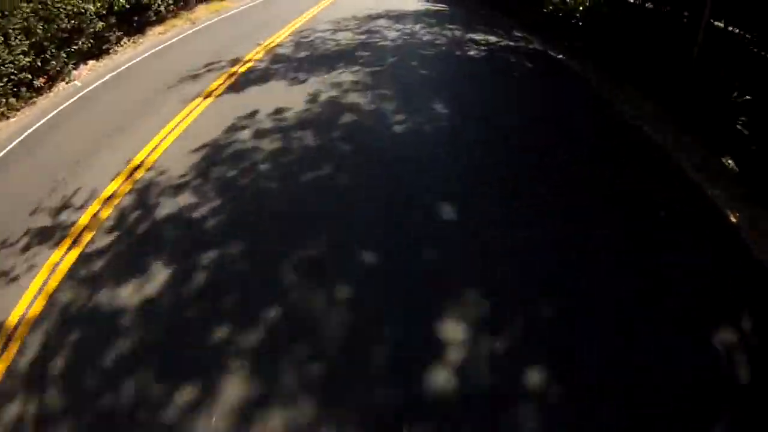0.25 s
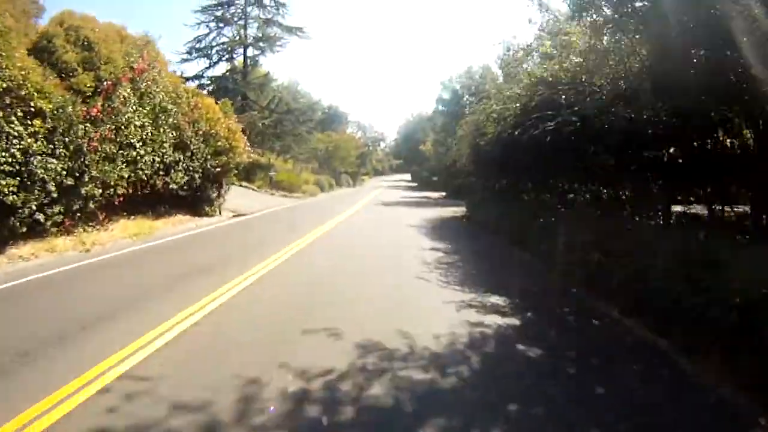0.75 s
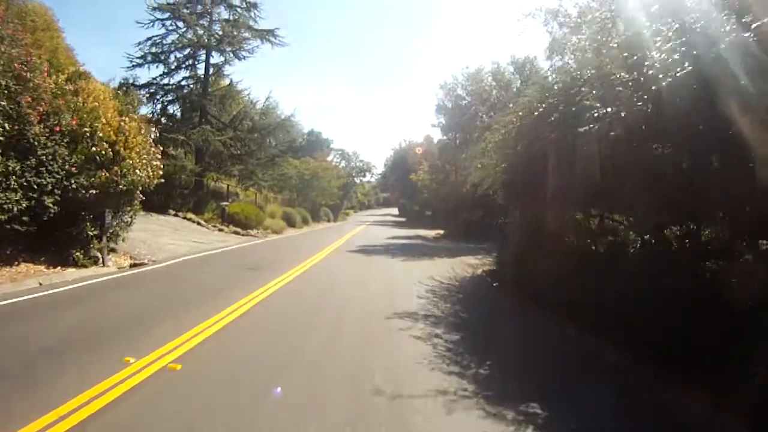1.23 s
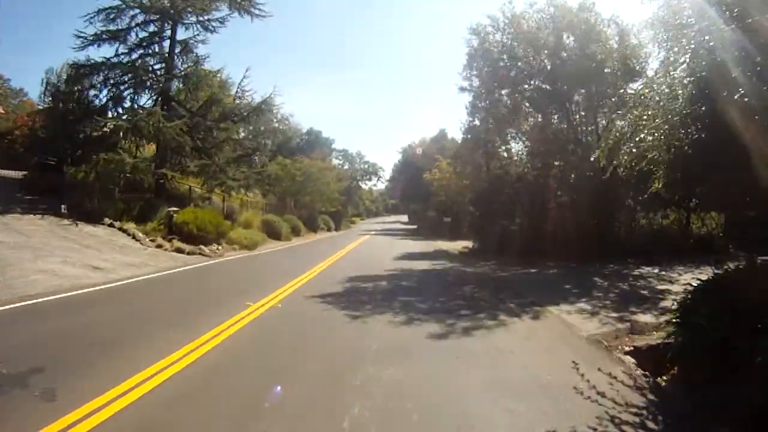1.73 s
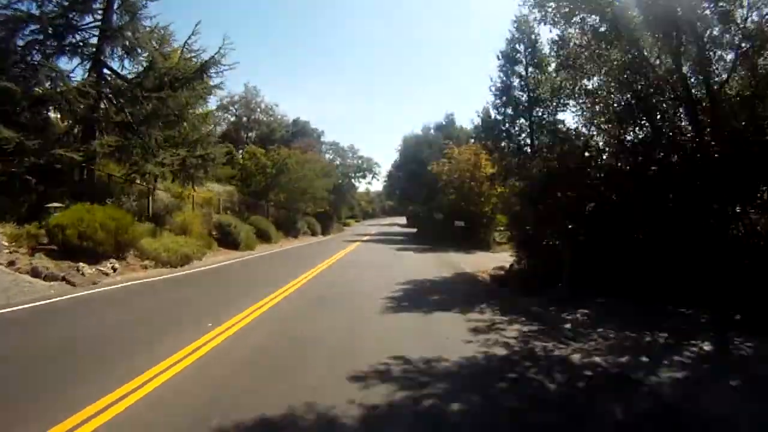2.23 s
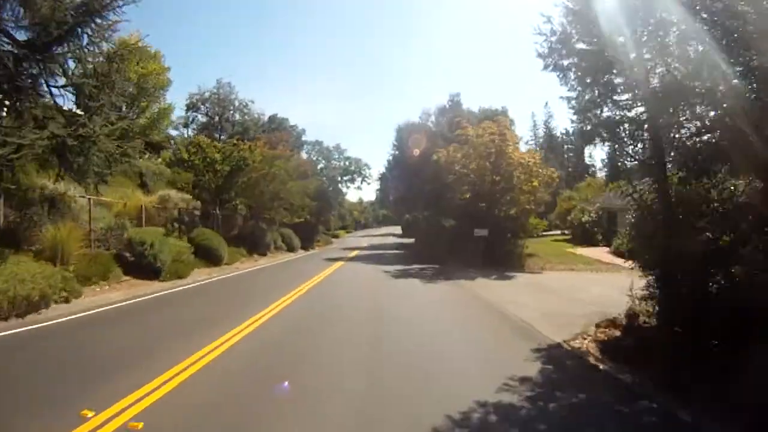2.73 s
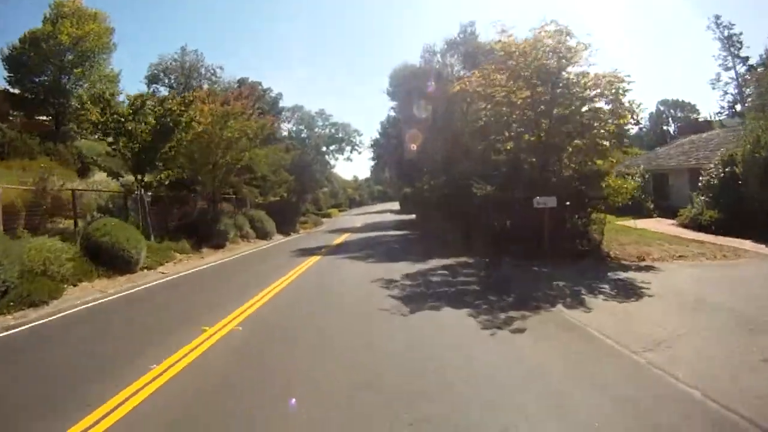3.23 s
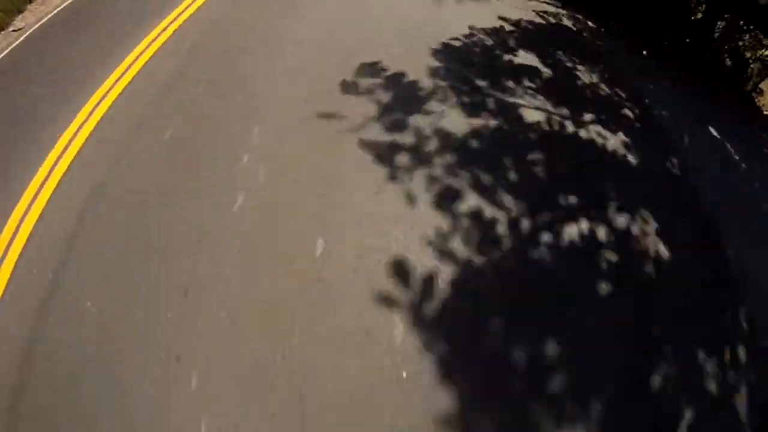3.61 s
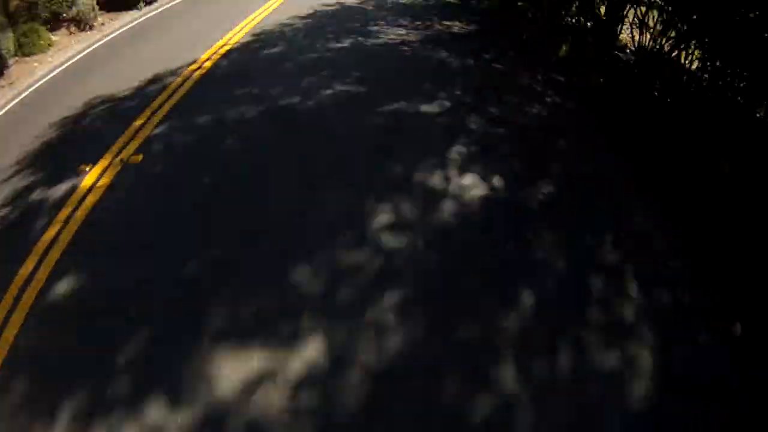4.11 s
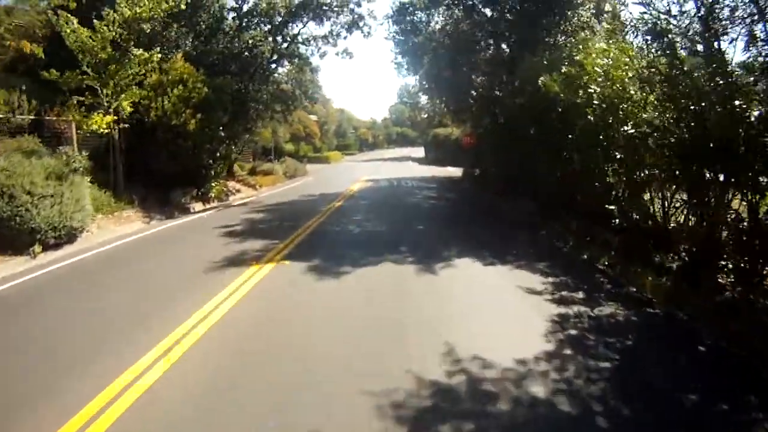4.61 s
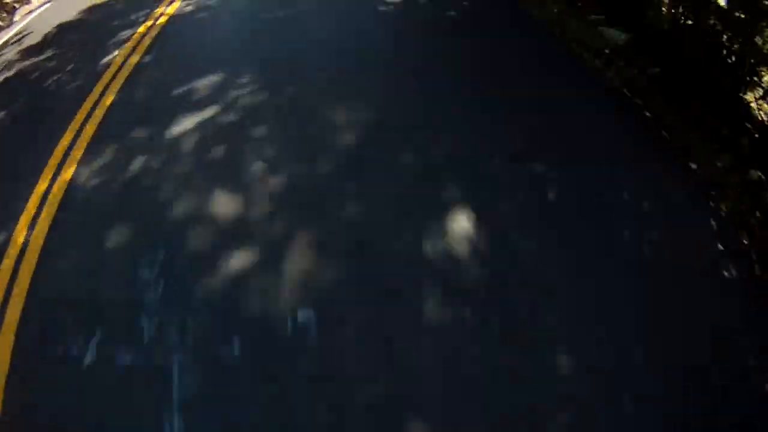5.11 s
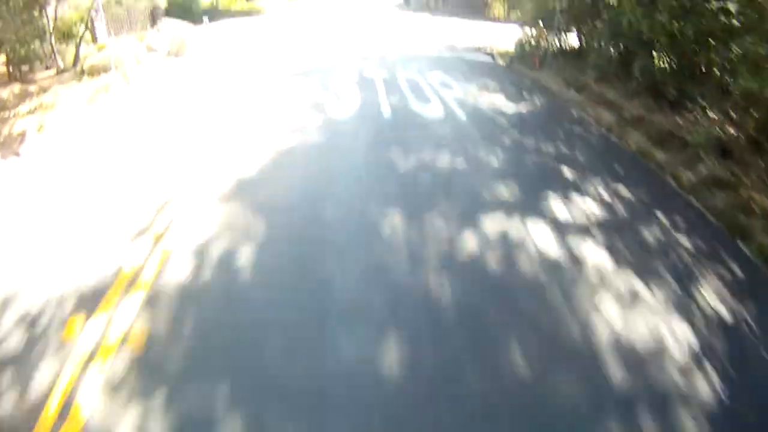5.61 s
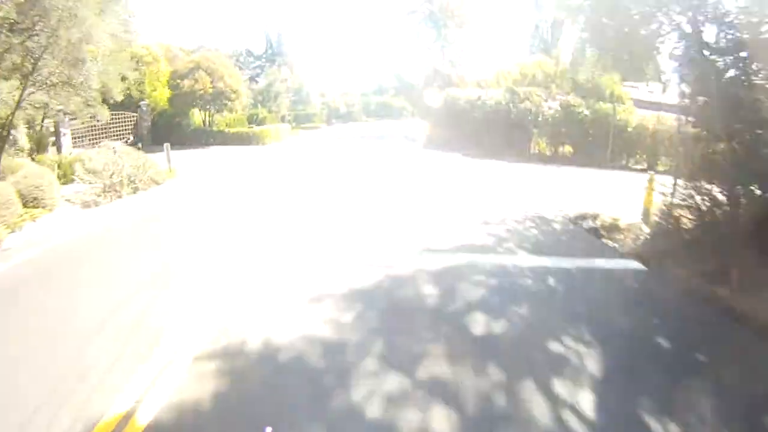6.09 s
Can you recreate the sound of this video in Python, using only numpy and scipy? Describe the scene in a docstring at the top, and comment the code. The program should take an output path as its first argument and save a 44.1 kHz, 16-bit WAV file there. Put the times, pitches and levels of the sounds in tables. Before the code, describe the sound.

A longboard rolls downhill on an open asphalt road, captured by a small camera microphone on board. A dense, grainy wheel rattle runs throughout, rising a little as speed builds, over a low wind drone and mount hum. At 0 s a brief rough scrub gives way to a duller tone and a soft wind thump near 0.2 s; brightness returns by 0.7 s. Short ringing scrapes near 2 kHz bite at 1.4, 1.55 and 1.7 s, a longer, softer one from 2.1 s, and the strongest at 2.85 to 3.3 s, fading slightly. From 3.5 to 4.1 s the wheels sound muffled, with a deep buffet at 3.6 s, then clear by 4.5 s with a gust around 4.3 s. They dull again from 5 to 5.6 s. Tiny stone ticks dot 5 to 6.3 s, sharpest just before 6 s, amid a swelling gust. Thin metallic treble throughout.

```python
"""Wheels rattle and scrub over asphalt: a longboard coasts downhill, slowly gathering speed, in the wind.
Random blows from stone chips excite wheels and deck; in the carves the urethane slips and rings near 2 kHz.
Three times the small camera that rides along tips down: the wheels turn duller and quieter, and eddies
buffet the microphone. Filtered noise makes the wind drone at the housing and the hum of the mount.
The camera holds each sample, which adds a thin metallic sheen."""
import sys
import numpy as np
from scipy import signal
from scipy.fft import rfft, irfft
from scipy.io import wavfile
from scipy.ndimage import map_coordinates

SR = 44100
rng = np.random.default_rng(int(sys.argv[2]) if len(sys.argv) > 2 else 0)


def file_out(sig):
    """Save sig as 16-bit WAV at sys.argv[1]."""
    # one column per channel
    cols = np.atleast_2d(sig).T
    # limit, then scale
    lim = np.clip(cols, -1, 1)
    pcm = np.round(lim * 32767).astype(np.int16)
    wavfile.write(sys.argv[1], SR, pcm)


N = 280035
T = np.arange(N) / SR  # time (s)


def undb(db):
    """Level definition: decibels to amplitude gain."""
    return 10 ** (np.asarray(db) / 20)


def unit(x):
    """Normalization: scale to rms 1."""
    return x / np.sqrt(np.mean(x ** 2))


def walk(rate, count=8192):
    """Slow random modulation: chance values, `rate` per second, joined by straight lines; rms 1."""
    knots = rng.standard_normal(count)
    return unit(map_coordinates(knots, [T * rate], order=1, mode="wrap"))


def swell(s, length):
    """Gaussian envelope: a bell-shaped rise and fall, 1 at its middle s."""
    return np.exp(-np.minimum((2 * (T - s) / length) ** 2, 20))


def response(spectrum, modes=(), size=8192):
    """Minimum phase: the causal impulse response of a broad colour with resonances on it."""
    f = np.maximum(np.fft.rfftfreq(size, 1 / SR), 1)
    hz, db = np.transpose(spectrum)
    gain_db = np.interp(np.log(f), np.log(hz), db)
    for centre, width, lift in modes:
        gain_db = gain_db + lift / (1 + (2 * (f - centre) / width) ** 2)
    # folding the cepstrum onto positive times makes the response causal
    cepstrum = irfft(np.log(undb(gain_db)))
    cepstrum[1:size // 2] *= 2
    cepstrum[size // 2 + 1:] = 0
    return irfft(np.exp(rfft(cepstrum)))


def ring(push, spectrum, modes=()):
    """Linear resonance: a push convolved with the body's impulse response; rms 1."""
    return unit(signal.oaconvolve(push, response(spectrum, modes))[:N])


def chips(per_s, scatter_db):
    """Random impact excitation: tiny blows at chance moments, of uneven size and either sign."""
    hit = rng.random(N) < per_s / SR
    size = rng.standard_normal(N) * undb(scatter_db * rng.standard_normal(N))
    return hit * size


# colour of wheels and deck on the road: (f/Hz, level/dB)
ROLL_SPECTRUM = [(120, -21.5), (280, -16), (550, -15), (820, -13), (1050, -6), (1500, -1), (1950, -0.5),
                 (2330, -6), (2570, -21), (3600, -15.5), (4050, -24), (4700, -27), (5300, -20.5),
                 (6000, -49.5)]
# resonances and dips of wheels and deck: (f/Hz, width/Hz, lift/dB)
DECK_RESONANCES = [(706, 78, 10), (939, 54, 6), (1174, 123, 6.5), (1470, 120, 1.6), (1533, 91, -4),
                   (1594, 70, 0.5), (2920, 83, 10), (3580, 230, 5)]
ROLL_DB, ROLL_RISE_DB_PER_S = -31.5, 0.5961  # base level, and growth as the board gathers speed


def rolling(texture):
    """Forced vibration: stone chips drum on the four wheels and shake the deck."""
    push = chips(per_s=12000, scatter_db=0.23) * undb(0.42 * texture)
    return ring(push, ROLL_SPECTRUM, DECK_RESONANCES)


# colour of a scrubbing wheel: (f/Hz, level/dB)
SCRUB_SPECTRUM = [(400, -48), (1000, -29.5), (1750, -15), (2000, -5.5), (2250, -6.5), (2600, -13),
                  (3050, -26.5), (3550, -36), (4100, -40.5), (5100, -27.5), (6000, -50.5)]
# resonances of the scrubbing wheel: (f/Hz, width/Hz, lift/dB)
WHEEL_RESONANCES = [(1951, 34, 7.5), (2060, 122, 6.5), (3308, 160, 14.5), (3874, 99, 15), (4500, 120, 4),
                    (4960, 280, 2.5)]


def scrubbing(texture, chatter_db=0.15, wobble_db=0.5):
    """Stick-slip friction: urethane grips and lets go in quick uneven bursts that ring the wheel."""
    stick_slip_db = chatter_db * walk(260) + 0.13 * texture + wobble_db * walk(20)
    push = chips(per_s=30000, scatter_db=1.0) * undb(stick_slip_db)
    return ring(push, SCRUB_SPECTRUM, WHEEL_RESONANCES)


# carves, where the wheels are pushed sideways:
# (start t/s, length t/s, scrub level/dB, sag of level in dB/s, extra grit level/dB)
CARVE_EVENTS = [(0.0, 0.052, -30.5, 0, 1.5), (0.6, 0.81, -36, -2, -0.3), (1.394, 0.12, -22, -7, 2.5),
                (1.556, 0.054, -20.5, 2, 1), (1.687, 0.33, -28.5, -5, 1.3), (2.143, 0.73, -29.5, -1.5, 1),
                (2.851, 0.43, -17.5, 10, -0.5)]
STRAIGHT_SCRUB_DB = -32.7
CARVE_ATTACK_S, CARVE_RELEASE_S = 0.034, 0.071


def carving():
    """Power addition: each carve bites quickly, drifts in level and lets go, over the straight-line scrub.

    Returns the scrub gain and the extra grit in dB.
    """
    power, grit_db = undb(STRAIGHT_SCRUB_DB) ** 2, 0
    for s, length, db, sag, extra_db in CARVE_EVENTS:
        age = np.maximum(T - s, 0)
        attack = np.minimum(age / CARVE_ATTACK_S, 1)
        release = np.exp(-np.maximum(age - length, 0) / CARVE_RELEASE_S)
        gate = attack * release
        power = power + (gate * undb(db - sag * age)) ** 2
        grit_db = grit_db + gate * extra_db
    return np.sqrt(power), grit_db


# colour of the hiss of the road grain: (f/Hz, level/dB)
GRIT_SPECTRUM = [(1200, -22.5), (2200, -1.5), (2650, 0.5), (2900, -1.5), (3200, -8.5), (3620, -9.5),
                 (4050, -14.5), (4700, -13.5), (5000, -12), (5450, -14.5), (6000, -25.5)]
GRIT_DB, GRIT_RISE_DB_PER_S = -37, 0.34  # base level, and growth as the board gathers speed


def grit(texture):
    """Contact noise: the sharpest edges of the road crackle in the contact patches."""
    push = chips(per_s=11000, scatter_db=1.0) * undb(0.36 * texture)
    return ring(push, GRIT_SPECTRUM)


# wind on the housing, its colour: (f/Hz, level/dB)
WIND_SPECTRUM = [(12, -22), (35, 1.5), (70, 3), (115, -4), (180, -9.5), (300, -23), (900, -16), (3000, -53)]
# resonance of the housing: (f/Hz, width/Hz, lift/dB)
HOUSING_RESONANCES = [(58.2, 24, 9.5)]
# gusts that swell the roar: (middle t/s, extra level/dB, length t/s)
GUST_EVENTS = [(0.55, 2.5, 0.76), (1.86, 4, 0.24), (4.28, 6, 0.39), (5.25, 5, 0.21), (5.933, 6.5, 0.41)]
ROAR_DB = -43.5
RUMBLE_RISE_DB_PER_S = 0.26  # growth of roar and hum as the board gathers speed


def wind_roar(flutter_db=0.5):
    """Turbulent pressure fluctuation: fluttering noise drones on the resonant housing and swells in gusts."""
    gust_db = sum(db * swell(s, length) for s, db, length in GUST_EVENTS)
    turbulence = rng.standard_normal(N) * undb(flutter_db * walk(9.4))
    roar = ring(turbulence, WIND_SPECTRUM, HOUSING_RESONANCES)
    return roar * undb(ROAR_DB + gust_db + RUMBLE_RISE_DB_PER_S * T)


# road shake in the camera mount, its colour: (f/Hz, level/dB)
MOUNT_SPECTRUM = [(50, -28.5), (120, -2.5), (180, 0), (260, -7.5), (450, -6), (900, -18), (3000, -40)]
# resonance of the camera mount: (f/Hz, width/Hz, lift/dB)
MOUNT_RESONANCES = [(195, 30.4, 12)]
HUM_DB = -45
HUM_SHADE = 0.078  # share of the tilt loss that the hum suffers (0-1)


def mount_hum(shade_db, shake_db):
    """Structure-borne sound: the shaking road makes the mount hum at its resonance."""
    hum = ring(rng.standard_normal(N), MOUNT_SPECTRUM, MOUNT_RESONANCES)
    return hum * undb(HUM_DB + shake_db - HUM_SHADE * shade_db + RUMBLE_RISE_DB_PER_S * T)


# slow eddies, their colour: (f/Hz, level/dB)
EDDY_SPECTRUM = [(4, -7), (11, -11.5), (17, -0.5), (28, -16), (60, -38), (200, -51)]
# large eddies that thump the microphone: (middle t/s, level/dB, length t/s)
BUFFET_EVENTS = [(0.178, -29.5, 0.16), (3.59, -28.5, 0.18), (4.837, -32, 0.069), (5.09, -44, 0.16)]
EDDY_DB = -55
EDDY_EXPOSURE = 0.73  # share of the tilt loss that the eddies gain (0-1)


def eddies(shade_db):
    """Hydrodynamic pressure: large eddies push slowly on the microphone, more so when it is tipped down."""
    thumps = sum(undb(db) * swell(s, length) for s, db, length in BUFFET_EVENTS)
    gain = undb(EDDY_DB + EDDY_EXPOSURE * shade_db) + thumps
    return ring(rng.standard_normal(N), EDDY_SPECTRUM) * gain


# the camera tips down, stays and comes back:
# (start t/s, way down t/s, stay t/s, way back t/s, hiss loss at first level/dB, at last level/dB)
TILT_EVENTS = [(0.05, 0.057, 0.36, 0.27, 4, 7), (3.48, 0.18, 0.39, 0.51, 15.5, 15.5),
               (4.945, 0.094, 0.51, 0.25, 6.5, 11.6)]
ROLL_SHADE, SCRUB_SHADE = 0.44, 0.89  # shares of that loss that rolling and scrubbing suffer (0-1)


def shade():
    """Shadowing: decibels of grit hiss lost while the camera points down."""
    loss_db = 0
    for s, down, stay, back, first, last in TILT_EVENTS:
        corners = s + np.cumsum([0, down, stay, back])
        loss_db = loss_db + np.interp(T, corners, [0, first, last, 0])
    return loss_db


# rougher stretches of asphalt:
# (middle t/s, length t/s, extra rolling level/dB, extra mount hum level/dB)
ROUGH_PATCHES = [(0.057, 0.31, 2.5, 3), (0.72, 0.56, 0.7, 3), (2.894, 0.75, -0.5, 3),
                 (4.28, 0.24, 2.2, 2.5), (4.797, 0.35, 0.4, 1), (6.046, 0.73, 1, 3.5)]


def rough_road():
    """Roughness excitation: decibels that rough stretches add to the rolling and to the mount hum."""
    return sum(np.outer([roll_db, hum_db], swell(s, length))
               for s, length, roll_db, hum_db in ROUGH_PATCHES)


# loose grains that tick under a wheel: (t/s, peak level/dB)
TICK_EVENTS = [(3.37, -28), (4.966, -19), (5.179, -24), (5.300, -25), (5.862, -17), (5.965, -12),
               (6.267, -25)]


def ticks(edge=0.3):
    """Impulse response: a loose grain gives one sharp knock to wheel and deck, with some grit on it."""
    blows = np.zeros(N)
    for s, db in TICK_EVENTS:
        blows[int(s * SR)] = undb(db)
    knock = response(ROLL_SPECTRUM, DECK_RESONANCES) + edge * response(GRIT_SPECTRUM)
    return signal.oaconvolve(blows, knock / np.abs(knock).max())[:N]


def scene():
    """Superposition: board and wind add; one road texture and one tilt act on rolling, scrub and grit."""
    texture, shade_db = walk(45), shade()
    scrub_gain, carve_db = carving()
    rough_db, shake_db = rough_road()
    roll_level_db = ROLL_DB + ROLL_RISE_DB_PER_S * T + rough_db - ROLL_SHADE * shade_db
    grit_level_db = GRIT_DB + GRIT_RISE_DB_PER_S * T + carve_db - shade_db
    board = rolling(texture) * undb(roll_level_db)
    board += scrubbing(texture) * scrub_gain * undb(-SCRUB_SHADE * shade_db)
    board += grit(texture) * undb(grit_level_db)
    rumble = wind_roar() + mount_hum(shade_db, shake_db) + eddies(shade_db)
    return (board + rumble + ticks())[None]


CAMERA_RATE, TOP_HZ = 12000, 15300  # samples per second; upper band edge (Hz)


def record(dry):
    """Sample-and-hold imaging: slow samples, each held, mirror the wheel band into the treble."""
    slow = signal.resample_poly(dry, CAMERA_RATE, SR, axis=1)
    held = np.repeat(slow, 4, axis=1)
    out = signal.resample_poly(held, SR, 4 * CAMERA_RATE, axis=1)[:, :N]
    lowpass = signal.ellip(10, .1, 80, TOP_HZ, fs=SR, output="sos")
    return signal.sosfilt(lowpass, out)


dry = scene()
out = record(dry)
file_out(out)
```